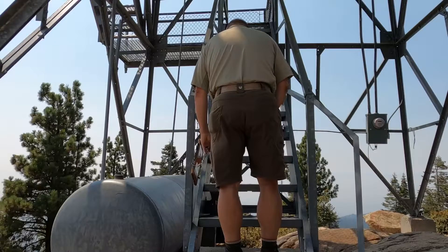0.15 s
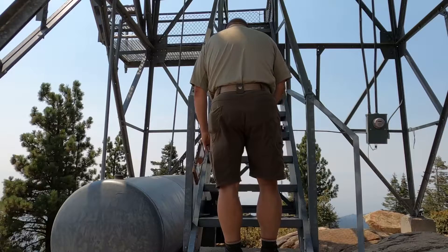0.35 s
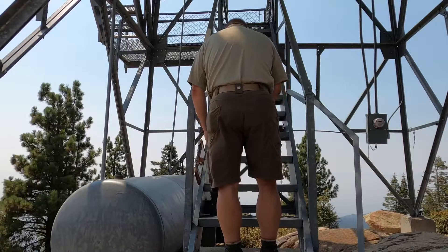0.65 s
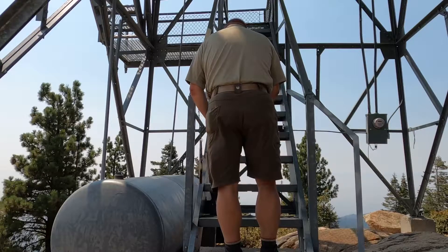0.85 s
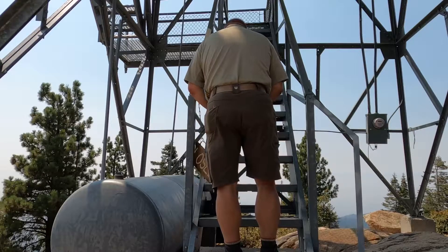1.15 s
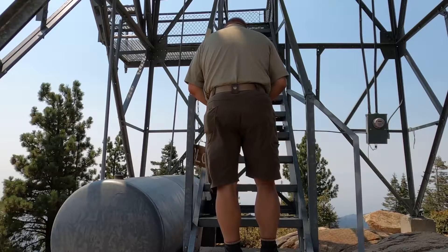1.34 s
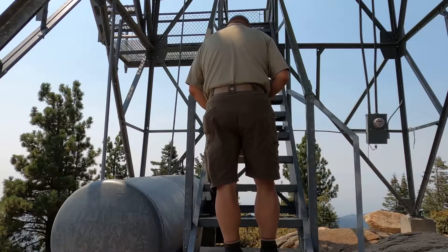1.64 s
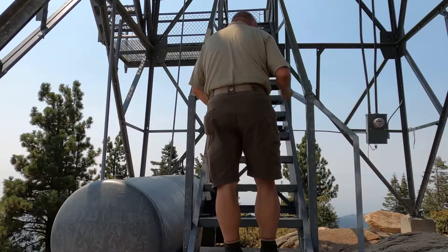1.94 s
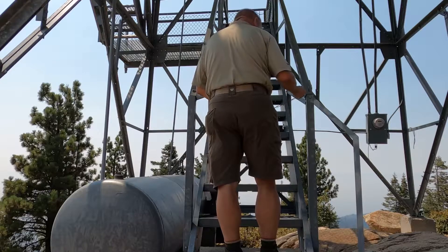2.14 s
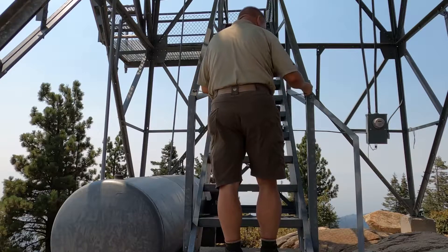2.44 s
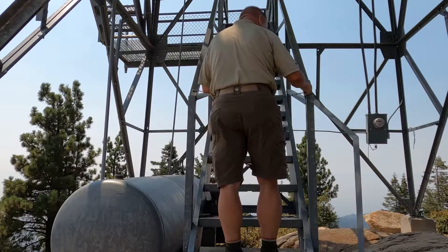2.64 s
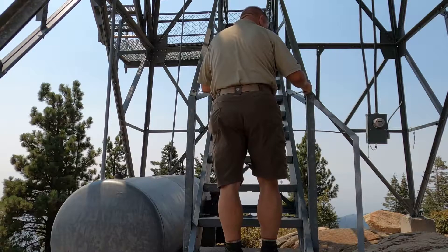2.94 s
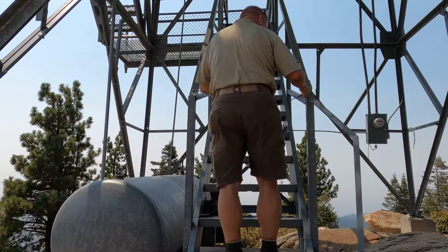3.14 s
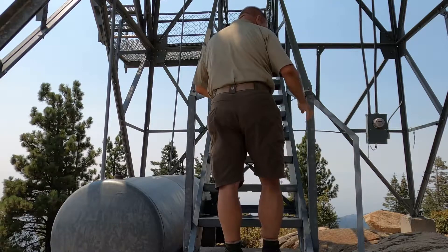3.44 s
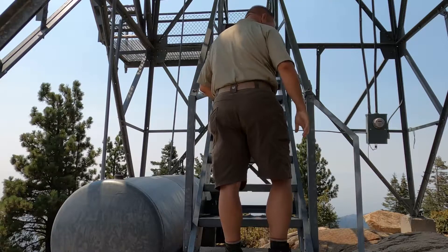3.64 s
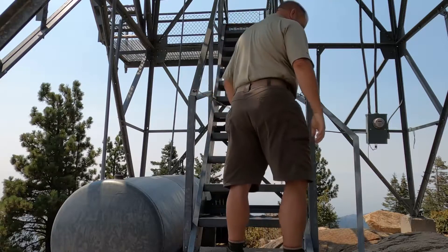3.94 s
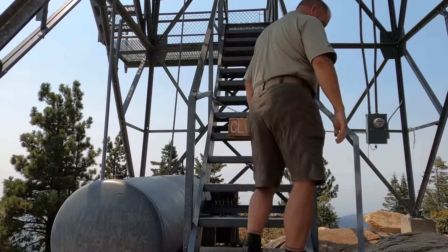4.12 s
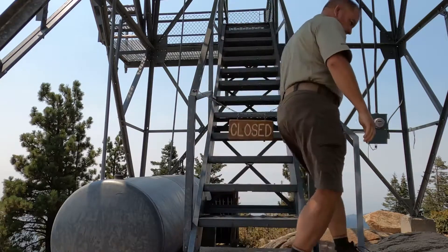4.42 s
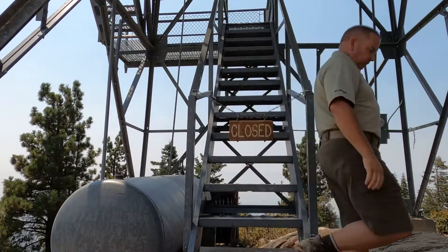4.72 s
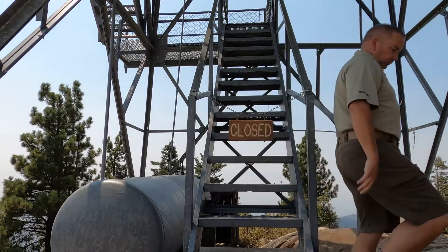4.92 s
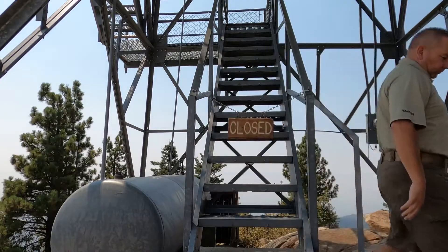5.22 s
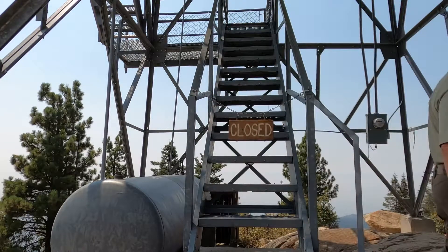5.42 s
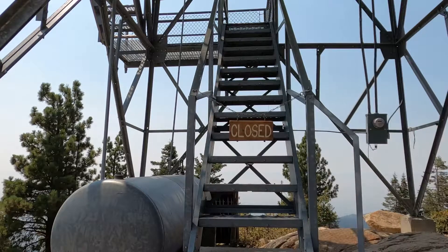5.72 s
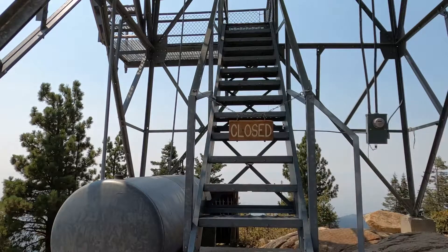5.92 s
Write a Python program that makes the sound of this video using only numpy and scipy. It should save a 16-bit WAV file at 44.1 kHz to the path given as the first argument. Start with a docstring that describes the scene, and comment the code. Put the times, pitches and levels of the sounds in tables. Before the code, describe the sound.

Strong low wind buffets two closely spaced microphone ports the whole time. Early dry snaps and a faint distant bird give way to a hook's click, hollow knocks on steel treads and a busy cluster of bright chain clinks around three seconds, ringing on through the stairs. Cloth rustles softly, heels thud and grit crackles, with sharp clacks from the left and one tiny dropout near the end.

```python
"""Mountain wind, made of filtered noise, buffets two microphone ports throughout; pines hiss behind it.
First come dry clacks from the left (snaps with echoes) and two faint bird whistles (wavering sines).
From about 1.1 s a man hooks a chained sign across the steel stairs of a lookout tower: knocks, clinks and,
near 3 s, the swinging chain drive ringing modes. He then rustles and walks off over gritty rock, with thuds
and crackling grains; two more clacks fall among his steps, and the sound drops out briefly near 5 s."""
import sys
import numpy as np
from scipy import signal
from scipy.fft import rfft, irfft
from scipy.io import wavfile
from scipy.ndimage import uniform_filter1d, map_coordinates

SR = 44100
rng = np.random.default_rng(int(sys.argv[2]) if len(sys.argv) > 2 else 0)


def unload_audio(sound):
    """Save the sound as a 16-bit wav file, at the path given as the first command line argument."""
    columns = np.transpose(np.atleast_2d(sound))
    # keep every value between -1 and 1, then stretch to whole-number steps
    steps = np.round(np.clip(columns, -1, 1) * 32767)
    wavfile.write(sys.argv[1], SR, steps.astype(np.int16))


N = 267687
T = np.arange(N) / SR  # time in seconds
HALF = SR // 2  # samples in half a second


def gain(db):
    """Turn decibels into a factor."""
    return 10 ** (np.asarray(db) / 20)


def unit(x):
    """Scale to an rms of 1."""
    return x / np.sqrt(np.mean(x ** 2))


def struck(x):
    """Scale a ring so that its first hundredth of a second has an rms of 1."""
    return x / np.sqrt(np.mean(x[:SR // 100] ** 2))


def colour(x, points):
    """Filter with a (Hz, dB) curve; the minimum-phase filter never sounds ahead of its input."""
    hz, db = np.transpose(points)
    size = 8192
    log_bins = np.log(np.fft.rfftfreq(size, 1 / SR) + 1)
    curve = gain(np.interp(log_bins, np.log(hz), db))
    cepstrum = irfft(np.log(curve))
    # folding the cepstrum forward gives minimum phase
    cepstrum[1:size // 2] *= 2
    cepstrum[size // 2 + 1:] = 0
    response = irfft(np.exp(rfft(cepstrum)))
    return signal.fftconvolve(x, response)[:len(x)]


def band(x, hz, q):
    """One resonance; a higher q is narrower."""
    w = 2 * np.pi * min(hz, SR / 3) / SR
    a = np.sin(w) / (2 * q)
    return signal.lfilter([a, 0, -a], [1 + a, -2 * np.cos(w), 1 - a], x)


def add(track, s, x):
    """Mix a sound into a track at time s."""
    i = int(s * SR)
    x, i = x[max(-i, 0):], max(i, 0)
    track[i:i + len(x)] += x[:N - i]


def fade(t60, length):
    """Exponential decay that falls 60 dB in t60 seconds."""
    return np.exp(-np.log(1000) * T[:length] / t60)


def burst(t60):
    """Half a second of dying noise."""
    return rng.standard_normal(HALF) * fade(t60, HALF)


def dying_sine(hz, t60, length):
    """One mode of a ringing body, from a random phase."""
    return np.sin(2 * np.pi * (hz * T[:length] + rng.random())) * fade(t60, length)


def grains(length, rate, spread_db):
    """Random tiny impacts of uneven size, about rate per second."""
    chance, size = rng.random(length), rng.standard_normal(length)
    impacts = np.sign(size) * gain(spread_db * np.minimum(abs(size), 2))
    return unit((chance < rate / SR) * impacts + 1e-9)


def through(force, response):
    """Drive a body with a force; the body's response has unit energy."""
    return signal.fftconvolve(force, response / np.linalg.norm(response))[:len(force)]


def walk(rate):
    """Random levels held 1 / rate seconds and smoothed twice; spread near 1."""
    k = int(SR / rate)
    held = np.repeat(rng.standard_normal(N // k + 1), k)
    return 1.67 * uniform_filter1d(uniform_filter1d(held, k), k)[:N]


def swell(s, rise_s, fall_s):
    """Exponential rise to a peak at time s, then an exponential fall."""
    return np.exp(np.minimum((T - s) / rise_s, (s - T) / fall_s))


# Knocks on the stairs. Each row: start in seconds, dull blow level in dB, contact centre in Hz,
# ring of the stairs in dB, ring of the tread in dB, place along the tread from 0 to 1.
KNOCKS = [(1.165, -65, 650, -70.5, -52, 0.52), (1.246, -45, 640, -52.5, -41.5, 0.47),
          (1.528, -37, 1021, -52.5, -37, .5), (1.623, -47.5, 1163, -67, -40.5, 0.38),
          (1.961, -46, 1090, -67, -50, 0.38), (2.872, -44, 1330, -72.5, -46, 0.01),
          (3.216, -42, 1200, -75.5, -44.5, 0.24), (3.259, -51, 1480, -43.5, -53, 0.37)]
# Tone of the dull blow. Each row: frequency in Hz, relative level in dB.
KNOCK_COLOUR = [(150, -1), (330, 8.5), (480, 13), (620, 11), (800, -7), (1100, 4), (1280, -0.5),
                (1520, 1.5), (1850, -7), (2300, 1), (3500, -4), (5500, -11), (12000, -38)]
# Clinks of hook and chain, and the bright edge of a knock.
# Each row: start in seconds, tick level in dB, ring level in dB, brightness in Hz,
# ping of the links in dB, shaking of the stairs in dB, note of the struck part in Hz, its level in dB.
CLINKS = [(1.152, -55.5, -72, 3600, -76, -76.5, 1382, -68),
          (1.172, -54, -65, 4400, -73, -77.5, 1390, -66.5), (1.53, -61.5, -55, 2800, -69, -65.5, 1953, -50),
          (1.666, -67, -81.5, 5530, -64.5, -73, 7560, -81),
          (1.983, -71.5, -63.5, 4190, -77, -81, 3840, -72),
          (2.574, -59, -51.5, 1800, -51, -49.5, 1312, -54),
          (2.711, -43, -43.5, 2860, -54, -54.5, 3377, -44),
          (2.815, -49.5, -58, 2800, -66.5, -55, 2825, -53.5),
          (2.915, -54.5, -54.5, 2400, -52.5, -56, 3015, -52),
          (3.108, -55.5, -49.5, 6100, -52.5, -63.5, 2120, -46.5),
          (3.196, -50.5, -54.5, 2500, -54.5, -60, 2143, -49.5),
          (3.26, -44.5, -51.5, 3950, -54.5, -64, 3844, -49),
          (3.285, -44, -45.5, 3980, -58, -59.5, 4244, -47),
          (3.4, -52.5, -55, 3110, -68.5, -58, 3260, -51.5),
          (3.447, -50.5, -61, 4100, -73, -70.5, 2463, -62)]
# Tone of loose chain links. Each row: frequency in Hz, relative level in dB.
LINK_COLOUR = [(700, -17), (1500, 11.5), (3200, -2.5), (4600, -2.5), (5500, -5.5), (6400, -22), (8000, -12),
               (9300, -20), (11000, -18.5), (15000, -42)]
GATE_S = 1.085  # when the gate of the hook snaps


def steelwork(knock_t60=0.079, tick_t60=0.051, build_s=0.002):
    """Knocks, clinks and the chain set the steel stairs ringing; the metal of a clink builds up in a moment."""
    out, rings = np.zeros(N), stair_rings(count=5)
    build_up = 1 - np.exp(-T[:HALF] / build_s)
    for k, (s, db, hz, ring_db, tread_db, place) in enumerate(KNOCKS):
        blow = struck(band(colour(burst(knock_t60), KNOCK_COLOUR), hz, q=0.788))
        ring = struck(band(rings[k % len(rings)], hz, q=0.47))
        add(out, s, gain(db) * blow)
        add(out, s, gain(tread_db) * tread(hz, place))
        add(out, s, gain(ring_db) * ring)
    for k, (s, tick_db, metal_db, hz, ping_db, ring_db, note_hz, note_db) in enumerate(CLINKS):
        tick = struck(band(colour(burst(tick_t60), LINK_COLOUR), hz, q=0.7))
        metal = gain(metal_db) * struck(band(metal_response(), hz, q=1.9))
        metal = metal + gain(ping_db) * ping() + gain(note_db) * struck_part(note_hz)
        shaking = struck(band(rings[k % len(rings)], 1596, q=2.9))
        add(out, s, gain(tick_db) * tick)
        add(out, s, build_up * metal)
        add(out, s, gain(ring_db) * shaking)
    add(out, GATE_S, gate())
    return out + sum(chain(stairs) for stairs in rings) / np.sqrt(len(rings))


def stair_rings(count):
    """Several rings of the stairs, alike in tone, each with fresh phases and noise."""
    return [stair_response() for _ in range(count)]


# Clear modes of the stairs. Each row: frequency in Hz, relative level in dB.
STAIR_MODES = [(610, 1), (655, -7.5), (1034, 15), (1077, 5.5), (1238, -2), (1313, 12), (1513, 2),
               (1552, 11.5), (1743, 6.5), (1894, 6), (2067, 1), (2374, -3), (2611, -1), (2790, -14.5),
               (2853, -2.5), (3332, -11)]
# Tone of the crowd of weaker modes. Each row: frequency in Hz, relative level in dB.
STAIR_COLOUR = [(150, -20), (350, 12), (620, 4), (820, -1.5), (1080, 5), (1700, 2.5), (2300, -2),
                (3300, -8), (4600, -13), (5600, -17.5), (8000, -21), (12000, -46.5)]
# How long the stairs ring. Each row: frequency in Hz, time to fall 60 dB in seconds.
STAIR_T60 = [(400, 2.09), (1300, 1.556), (2600, 2), (5000, 1.5), (10000, 0.33)]


def stair_response(modes_db=-11):
    """Clear modes within a crowd of weak ones; the highest treble dies first."""
    length = 2 * SR

    def t60(hz):
        return np.interp(hz, *np.transpose(STAIR_T60))

    clear = sum(gain(db) * dying_sine(hz, t60(hz), length) for hz, db in STAIR_MODES)
    noise, bins = rfft(rng.standard_normal(length)), np.fft.rfftfreq(length, 1 / SR)
    crowd = np.zeros(length)
    for low_hz in 125 * 2 ** np.arange(7):  # one octave of noise at a time
        octave = irfft(noise * (bins >= low_hz) * (bins < 2 * low_hz))
        crowd += octave * fade(t60(low_hz * np.sqrt(2)), length)
    return gain(modes_db) * unit(clear) + unit(colour(crowd, STAIR_COLOUR))


# Modes of a single tread, lowest first.
# Each row: frequency in Hz, relative level in dB, time to fall 60 dB in seconds.
TREAD_MODES = [(627.9, -1.5, 0.06), (1067.3, -2.5, .09), (1513, 1.5, 0.033), (2237, -4.5, .07)]
TREAD_FOCUS = 4.4  # how narrowly the contact picks among the modes


def tread(hz, place, contact_s=.0004):
    """A tread rings briefly; the place and contact frequency of the blow choose among its modes."""
    ring = 0
    for k, (mode_hz, db, t60) in enumerate(TREAD_MODES):
        contact = 1 / np.hypot(1, TREAD_FOCUS * (mode_hz / hz - hz / mode_hz))
        shape = np.sin((k + 1) * np.pi * place)  # a mode stays silent when hit where it stands still
        ring = ring + gain(db) * contact * shape * dying_sine(mode_hz, t60, HALF)
    return struck(ring * (1 - np.exp(-T[:HALF] / contact_s)))


# Clusters of modes of hook and links. Each row: centre in Hz, nominal width in Hz, relative level in dB.
METAL_MODES = [(1400, 380, -8.5), (1938, 210, 1.5), (2658, 350, 6), (3330, 340, -0.5), (4200, 460, -3),
               (5298, 390, -3.5), (5800, 1600, -2.5), (6800, 350, -8), (7600, 300, -10.5)]


def metal_response(t60=0.437, links_db=-15, vary_db=2):
    """Hook and links ring in clusters of close modes; each clink stirs them differently."""
    clusters = np.zeros(HALF)
    for hz, width, db in METAL_MODES:
        level = gain(db + vary_db * rng.standard_normal())
        ring = band(band(burst(t60), hz, hz / width), hz, hz / width / 2)
        clusters += level * unit(ring)
    return unit(clusters) + gain(links_db) * unit(colour(burst(t60), LINK_COLOUR))


# Ping of the links, a tight cluster of modes. Each row: frequency in Hz, relative level in dB.
PING_COLOUR = [(4000, -40), (4900, -19), (5150, -3), (5350, 1), (5850, -2.5), (6150, -15), (6800, -25),
               (7750, -18), (9000, -38)]


def ping(t60=0.364):
    """Alike links ring together in one shimmering band, strongest at the instant they meet."""
    meeting = 1 + gain(1) * fade(.06, HALF)
    shimmer = unit(colour(rng.standard_normal(SR), PING_COLOUR))[-HALF:]
    return shimmer * fade(t60, HALF) * meeting


def struck_part(hz, t60=0.224, q=11):
    """The struck part adds a narrow, beating note of its own."""
    note = unit(band(band(rng.standard_normal(SR), hz, q), hz, q))
    return note[-HALF:] * fade(t60, HALF)


# Modes of the hook's gate. Each row: frequency in Hz, relative level in dB, time to fall 60 dB in seconds.
GATE_MODES = [(1447, -3, 0.035), (1643, -3, 0.079), (2128, 1, 0.06), (3448, 1, 0.0137), (4030, -10, 0.3),
              (4380, -11, 0.052), (5030, -11, 0.07), (5580, -17, 0.18), (7850, -10.5, 0.068),
              (10450, -36, 0.11)]
GATE_DB = -41.5


def gate(tick_db=-1, tick_t60=0.0185, q=14):
    """The sprung gate shuts with a tick and buzzes briefly in its resonances."""
    ring = np.zeros(HALF)
    for hz, db, t60 in GATE_MODES:
        ring += gain(db) * struck(band(band(burst(t60), hz, q), hz, q / 2))
    tick = band(colour(burst(tick_t60), LINK_COLOUR), 5130, q=1.0)
    return gain(GATE_DB) * (struck(ring) + gain(tick_db) * struck(tick))


# The chain slides, drops and swings out.
# Each row: peak time in seconds, level in dB, rise in seconds, fall in seconds.
RATTLES = [(2.837, -48.5, 0.011, 0.0555), (3.302, -39, 0.075, 0.048), (3.681, -49, 0.043, 0.088)]
# Tone of grit, also lent to the ticks of the links. Each row: frequency in Hz, relative level in dB.
GRIT_COLOUR = [(200, 16), (600, 6.5), (850, -2.5), (1300, 4), (2000, 0), (3500, -7.5), (5500, -10),
               (8000, -18.5), (11000, -27), (15000, -30.5)]
HARDNESS = 0.39  # gentle collisions are duller: dB of ticks and shimmer lost per dB of motion
JINGLE_HZ, JINGLE_DB = 10470, -28.5  # the highest ring of colliding links


def chain(stairs, stairs_db=-1, links_db=-5, links_t60=0.21, ticks_db=-3):
    """In each rattle links collide at random: each ticks, shimmers briefly and shakes the stairs."""
    motion = sum(gain(db) * swell(s, rise, fall) for s, db, rise, fall in RATTLES)
    vigour = motion / motion.max()
    force = grains(N, rate=75, spread_db=0.5) * motion
    sharp = force * vigour ** HARDNESS
    link_body = colour(burst(links_t60), LINK_COLOUR)
    jingle_body = band(band(burst(0.11), JINGLE_HZ, q=11), JINGLE_HZ, q=11)
    tick_body = band(colour(burst(0.017), GRIT_COLOUR), 2700, q=1.0)
    return (gain(stairs_db) * through(force, stairs)
            + gain(links_db) * through(sharp, link_body)
            + gain(JINGLE_DB) * through(force * vigour, jingle_body)
            + gain(ticks_db) * through(sharp, tick_body))


# Short scuffs and rustles, and a small rattle just before a clink.
# Each row: middle in seconds, level in dB, half length in seconds, brightness in Hz.
SHORT_RUBS = [(0.129, -68.5, 0.0024, 5000), (0.173, -60, 0.00394, 5890), (0.238, -67.5, 0.0175, 5020),
              (0.534, -55.5, 0.0028, 2493), (0.823, -64, 0.0319, 2200), (0.93, -56, 0.0034, 1940),
              (1.124, -62, 0.0262, 2480), (2.027, -68, 0.074, 1900), (2.259, -57, 0.00927, 4820),
              (2.697, -58.5, 0.012, 3180), (4.555, -62.5, 0.0058, 4510), (4.597, -63.5, 0.0039, 5000),
              (4.606, -52, 0.0065, 4500), (4.642, -57.5, 0.0069, 4120), (4.729, -44.5, 0.01137, 2277),
              (4.794, -50.5, 0.00847, 2206), (5.022, -51.5, 0.0089, 1900), (5.393, -61.5, 0.0166, 4420),
              (5.43, -47.5, 0.0083, 4970), (5.479, -43, 0.00626, 4100), (5.863, -59.5, 0.0137, 4000),
              (5.985, -67, 0.174, 1600)]
# Heels on rock. Each row: start in seconds, level in dB, centre in Hz,
# snap of a grain of grit against the thud in dB.
HEELS = [(4.712, -47.5, 1295, -8), (4.766, -49, 1100, -20), (4.786, -48.5, 2040, -18),
         (5.423, -43.5, 1800, -8), (5.477, -34.5, 2170, -5), (5.512, -44, 2835, -16.5)]
DRAG_DB, DRAG_STRETCH = -19.5, 4.3  # a softer swell around each rub, this many times as long
SNAP_HZ = 7000  # brightness of the grit that snaps under a heel


def footwork(scatter_db=-13, scatter_t60=0.332, crack_db=-8):
    """Heels thud, short rubs crackle in swells of grains, cloth rustles, and all scatters off the rocks."""
    out, t = clothes() + grinding(), T[:HALF] - 1 / 4
    for s, db, half, hz in SHORT_RUBS:
        rub = band(colour(grains(len(t), rate=2600, spread_db=12.5), GRIT_COLOUR), hz, q=0.47)
        # a few grains crack, sharper and brighter than the rub
        cracks = band(colour(grains(len(t), rate=120, spread_db=22.0), GRIT_COLOUR), 3 * hz, q=0.38)
        pressure = 1 / np.cosh(t / half) + gain(DRAG_DB) / np.cosh(t / (half * DRAG_STRETCH))
        add(out, s + t[0], gain(db) * (unit(rub) + gain(crack_db) * unit(cracks)) * pressure)
    snap = struck(band(colour(signal.unit_impulse(len(t)), GRIT_COLOUR), SNAP_HZ, q=0.28))
    for s, db, hz, snap_db in HEELS:
        thud = struck(band(colour(burst(0.0553), GRIT_COLOUR), hz, q=1.17))
        add(out, s, gain(db) * (thud + gain(snap_db) * snap))
    rocks = band(burst(scatter_t60), 2100, q=0.28)
    return out + gain(scatter_db) * through(out, rocks)


# A sole grinds over grit. Each row: middle in seconds, level in dB, half length in seconds, centre in Hz.
GRINDS = [(4.661, -59, 0.0158, 2810), (4.697, -54.5, 0.0068, 2900), (4.733, -47.5, 0.0068, 3810),
          (5.434, -42.5, 0.014, 1582), (5.462, -51.5, 0.0208, 3050)]


def grinding(q=2.82):
    """Grit sticks and slips under a turning sole and rings one narrow resonance."""
    out, t = np.zeros(N), T[:HALF] - 1 / 4
    for s, db, half, hz in GRINDS:
        slips = band(band(grains(len(t), rate=1500, spread_db=17.0), hz, q), hz, q)
        add(out, s + t[0], gain(db) * unit(slips) / np.cosh(t / half))
    return out


# Clothes rustle while he handles the sign and while he walks off.
# Each row: start in seconds, end in seconds, level in dB.
RUSTLES = [(1.174, 1.614, -69.5), (4.017, 6.038, -68)]
RUSTLE_FADE_S = 0.054


def clothes(uneven_db=2):
    """Fine crackle of cloth that comes and goes with his movements."""
    moving = np.zeros(N)
    for start, end, db in RUSTLES:
        moving += gain(db) * np.clip(np.minimum(T - start, end - T) / RUSTLE_FADE_S, 0, 1)
    cloth = band(colour(grains(N, rate=2900, spread_db=9.5), GRIT_COLOUR), 2900, q=0.38)
    return moving * gain(uneven_db * walk(22)) * unit(cloth)


# Dry clacks. Each row: start in seconds, level in dB, brightness in Hz,
# rough body against the snap in dB, narrowness as a Q.
CLACKS = [(.251, -44.5, 1297, -26, 0.39), (0.543, -44, 5180, -21.5, 1.31),
          (0.546, -36.5, 1167, -19.5, 0.98), (4.368, -39, 2154, -26.5, 0.72),
          (5.0652, -31, 1335, -18, 0.803)]
# Tone of the clacks. Each row: frequency in Hz, relative level in dB.
CLACK_COLOUR = [(200, 15), (500, 3.5), (1100, 2), (1900, -1), (2800, -11), (5000, -14), (8000, -27.5),
                (13000, -47)]
# The snap and its reflections from nearby steel. Each row: lag in seconds, relative level in dB.
CLACK_ECHOES = [(0, 0), (.0039, -7), (.0067, -9), (.0076, -11)]


def clacks(tail_db=-34, tail_t60=0.293, tail_hz=2600, body_t60=0.0665):
    """A sharp snap, its early reflections and a short, thin scatter through the tower."""
    out = np.zeros(N)
    for s, db, hz, body_db, q in CLACKS:
        body = gain(body_db) * burst(body_t60)
        snap = body + gain(tail_db) * band(burst(tail_t60), tail_hz, q=0.29)
        for lag, echo_db in CLACK_ECHOES:
            snap[int(lag * SR)] += gain(echo_db)
        add(out, s, gain(db) * struck(band(colour(snap, CLACK_COLOUR), hz, q)))
    return out


# Basic strength of the wind. Each row: time in seconds, strength in dB.
WIND = [(0.0, -27), (0.36, -30), (0.46, -37), (0.58, -29.5), (1.68, -24.5), (1.88, -36), (1.96, -23.5),
        (2.28, -34), (2.72, -26.5), (2.8, -33), (3.88, -24.5), (4.4, -32.5), (4.54, -26.5), (4.86, -30),
        (5.54, -28), (5.64, -37.5), (5.78, -31.5), (6.06, -42.5)]
# Gusts and lulls. Each row: middle in seconds, change of strength in dB, half length in seconds.
BUFFETS = [(0.132, 6.5, 0.0348), (0.222, -7, 0.0118), (0.305, 5, 0.0513), (0.646, 4, 0.0432),
           (0.954, 4.5, 0.027), (1.067, -5, 0.038), (2.431, 5.5, 0.0214), (2.873, 8, 0.0051),
           (2.977, 7, 0.0133), (3.036, -11, 0.0076), (3.272, 4, 0.073), (3.529, 10.5, 0.0222),
           (3.675, -7.5, 0.0328), (3.774, 5, 0.044), (3.928, 4.5, 0.031), (4.078, 5.5, 0.01126),
           (4.271, 8.5, 0.0316), (4.654, -9, 0.0096), (4.979, -9, 0.0155), (5.308, 4, 0.0125),
           (5.693, 8, 0.00866), (5.861, 13, 0.01044)]
# Tone of the low rumble. Each row: frequency in Hz, relative level in dB.
RUMBLE = [(12, -5.5), (25, -1), (45, 2), (70, -1.5), (110, -8.5), (160, -18), (240, -34), (400, -65.5),
          (900, -96.5)]
# Tone of the small eddies. Each row: frequency in Hz, relative level in dB.
EDDIES = [(50, -7), (110, -7.5), (170, 6.5), (250, -4), (350, -15), (500, -27), (750, -38.5), (1500, -74.5)]
BREEZE_DB = -27  # strength of an ordinary breeze
RUMBLE_DB, EDDIES_DB = -0.735, -46.5  # rumble against the strength; eddies in an ordinary breeze
EDDY_GROWTH = 1.578  # dB of eddies per dB of wind strength
FLUTTER_DB, EDDY_FLUTTER_DB = 1.4, 1.8  # random unrest of the strength and of the eddies
FLUTTER_RATE = 24  # new random levels per second
SWEEP_S = .0006  # time an eddy takes from the right port to the left


def wind(rumble_db=(5.5, -2.5), eddies_db=(1, 5), puffs_db=(-.5, 2.5), own_db=-2):
    """One strength drives each port's own rumble and faster-growing eddies that sweep across the ports."""
    surges = sum(db * np.exp(-((T - s) / half) ** 2 / 2) for s, db, half in BUFFETS)
    strength = np.interp(T, *np.transpose(WIND)) + surges + FLUTTER_DB * walk(FLUTTER_RATE)
    rumble = gain(strength + RUMBLE_DB)
    eddy_flutter = EDDY_FLUTTER_DB * walk(FLUTTER_RATE)
    eddies = gain(EDDIES_DB + EDDY_GROWTH * (strength - BREEZE_DB) + eddy_flutter)
    shared, hard, out = turbulence(EDDIES, steady_s=0.07), puffs(), []
    for r, e, p, lag in zip(rumble_db, eddies_db, puffs_db, (SWEEP_S, 0)):  # left, then right
        swirl = unit(shared + gain(own_db) * turbulence(EDDIES, steady_s=0.021))
        passing = gain(e) * eddies * swirl + gain(p) * hard
        passing = np.pad(passing, (int(lag * SR), 0), mode="edge")[:N]
        out.append(gain(r) * rumble * turbulence(RUMBLE, steady_s=0.038) + passing)
    return np.array(out)


def turbulence(points, steady_s, evenness=1.0):
    """Pressure noise of the wind, with its own slow swells evened out."""
    x = colour(rng.standard_normal(N + SR), points)[SR:]
    power = uniform_filter1d(x ** 2, int(steady_s * SR)) + 1e-18
    return unit(x / power ** (evenness / 2))


# Single hard puffs. Each row: middle in seconds, level in dB, half length in milliseconds.
PUFFS = [(.283, -14.5, 1.265), (0.369, -18, 1.33), (0.676, -23, 0.9), (1.441, -24, 0.543),
         (1.519, -14.5, 0.71), (1.996, -17, 1.383), (3.268, -13.5, 1.015), (3.337, -14, 1.06),
         (3.521, -15.5, 0.43), (3.903, -12.5, 0.64), (3.937, -7.5, 1.38), (3.948, -14.5, 0.487),
         (4.261, -18.5, 0.684), (4.278, -19, 0.462)]


def puffs():
    """Each is a pressure peak with a shallow suction on either side."""
    out, t = np.zeros(N), T[:SR // 10] - 1 / 20
    for s, db, half_ms in PUFFS:
        u = (t * 1000 / half_ms) ** 2
        add(out, s + t[0], gain(db) * (np.exp(-u / 2) - 0.28 * np.exp(-u / 20)))
    return out


# Tone of air in the pines. Each row: frequency in Hz, relative level in dB.
PINES = [(200, 6.5), (500, 1.5), (800, -4), (1150, 2), (1800, -3.5), (2600, -14), (5000, -17.5),
         (7500, -25.5), (10000, -43), (15000, -58)]
PINES_DB, PINES_GROWTH = -66, 0.737  # level in an ordinary breeze; dB per dB of wind strength


def pines():
    """Air in the trees hisses, rising and falling gently with the basic wind."""
    db = PINES_DB + PINES_GROWTH * (np.interp(T, *np.transpose(WIND)) - BREEZE_DB)
    return gain(db) * unit(colour(rng.standard_normal(N), PINES))


# A faint far bird. Each row: start in seconds, length in seconds, pitch in Hz, level in dB.
WHISTLES = [(.315, .23, 4630, -77), (.675, .29, 4620, -79)]


def bird(waver=.002, flutter_db=6.5, octave_db=-21):
    """Thin, level whistles that swell quickly, fade slowly and waver a little."""
    out = np.zeros(N)
    for s, length, hz, db in WHISTLES:
        t = T[:int(length * SR)]
        wavering = unit(band(rng.standard_normal(SR), 40, q=0.72))[:len(t)]
        pitch = hz * (1 + waver * wavering)
        phase = 2 * np.pi * np.cumsum(pitch) / SR
        tone = np.sin(phase) + gain(octave_db) * np.sin(2 * phase)
        add(out, s, gain(db) * np.sin(np.pi * np.sqrt(t / length)) ** 2 * tone)
    return out * gain(flutter_db * walk(50))


# Sound scattered by the tower and the rocks. Each row: frequency in Hz, relative level in dB.
SCATTER = [(500, -6), (1500, -5), (3000, -2), (6000, 1), (12000, 0)]


def ports(x, pan_db, scatter_db, lag_s):
    """Two close ports: the left hears a little later, and each gets its own scattered sound."""
    left = map_coordinates(x, [np.arange(N) - lag_s * SR], order=3)
    scattered = np.array([through(x, colour(burst(.07), SCATTER)) for _ in range(2)])
    balance = gain(np.array([[pan_db], [-pan_db]]) / 2)  # positive pan favours the left
    return balance * (np.array([left, x]) + gain(scatter_db) * scattered)


AHEAD_LAG_S, LEFT_LAG_S = 2.9e-5, 1.2e-5  # how much later the left port hears


def scene():
    """Stairs and steps ahead, clacks to the left, wind over everything."""
    stairs = ports(steelwork() + bird(), pan_db=0, scatter_db=-3.5, lag_s=AHEAD_LAG_S)
    steps = ports(footwork(), pan_db=.5, scatter_db=-3.5, lag_s=AHEAD_LAG_S)
    dry_clacks = ports(clacks(), pan_db=4.5, scatter_db=-9, lag_s=LEFT_LAG_S)
    trees = ports(pines(), pan_db=2.0, scatter_db=4.0, lag_s=LEFT_LAG_S)
    return wind() + stairs + steps + dry_clacks + trees


# An instant of silence: it runs from the first time to the second, both in seconds.
DROPOUT = (4.977, 4.995)
TOP_HZ = 15500  # nearly nothing is left above this


def record(dry):
    """The sound fades in at once, drops out for an instant, and loses its highest treble to a steep filter."""
    live = uniform_filter1d(1. * ((T < DROPOUT[0]) | (T > DROPOUT[1])), size=128)
    opening = np.minimum(T / .01, 1)
    top_cut = signal.ellip(8, .2, 70, TOP_HZ, fs=SR, output="sos")
    return signal.sosfilt(top_cut, dry * live * opening)


dry = scene()
out = record(dry)
unload_audio(out)
```